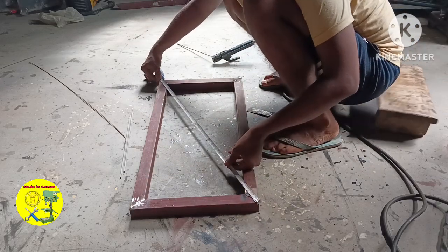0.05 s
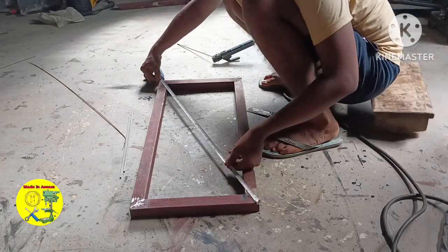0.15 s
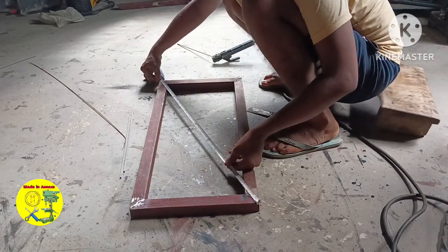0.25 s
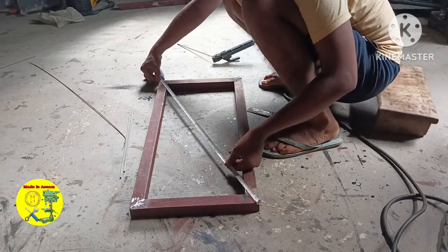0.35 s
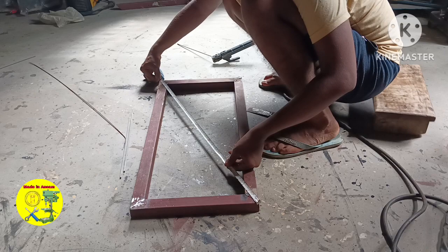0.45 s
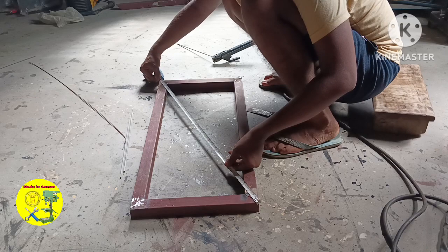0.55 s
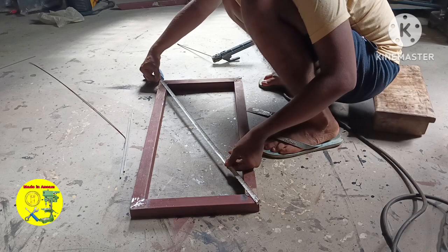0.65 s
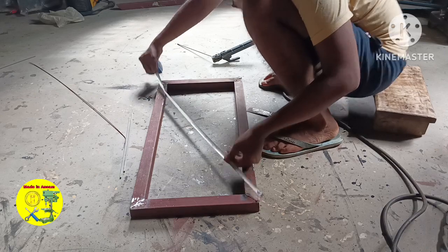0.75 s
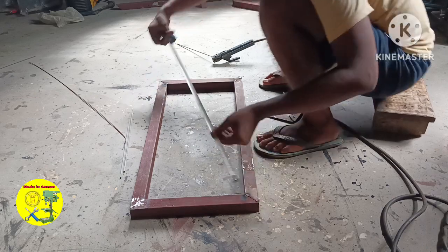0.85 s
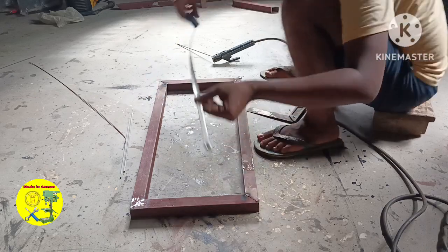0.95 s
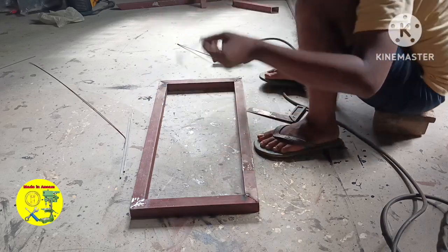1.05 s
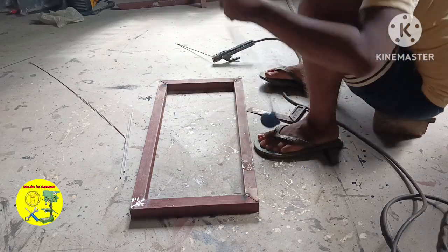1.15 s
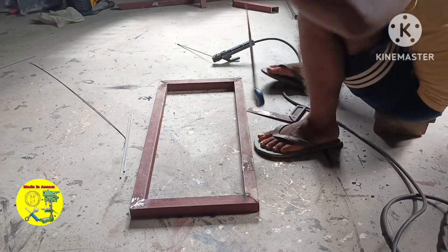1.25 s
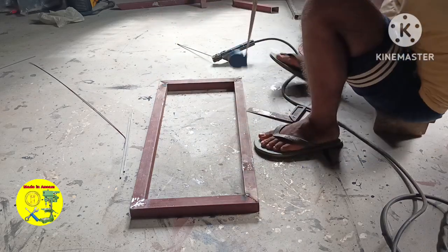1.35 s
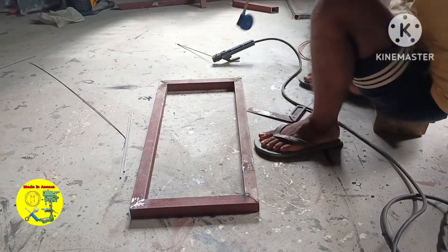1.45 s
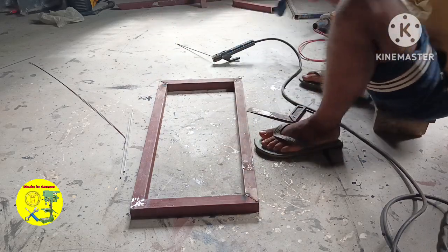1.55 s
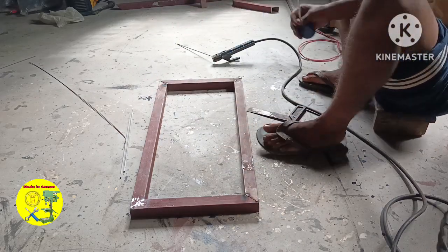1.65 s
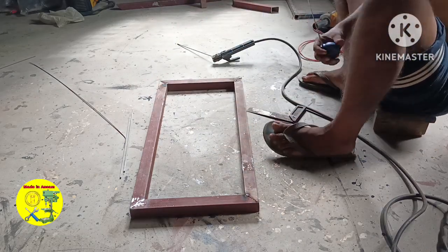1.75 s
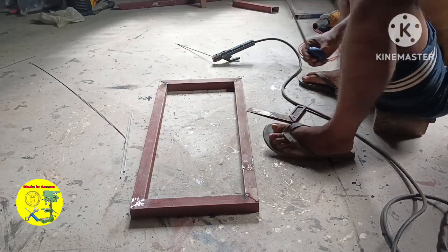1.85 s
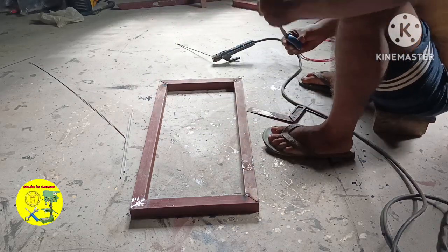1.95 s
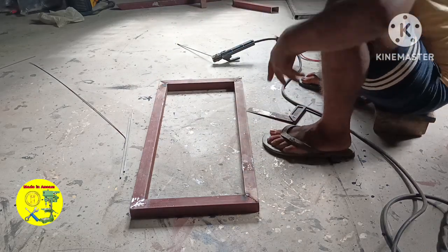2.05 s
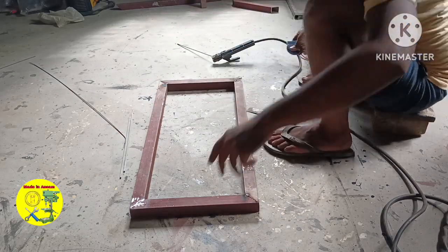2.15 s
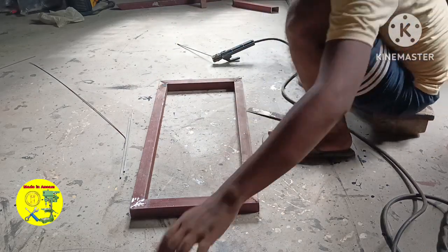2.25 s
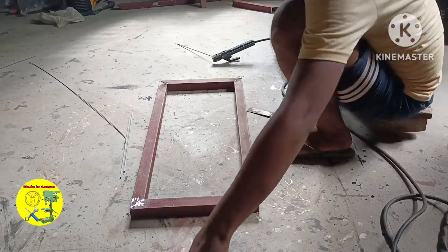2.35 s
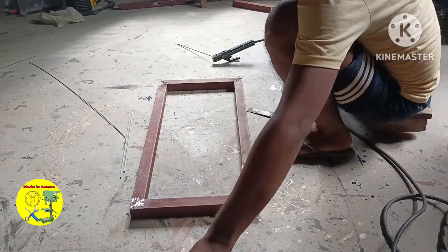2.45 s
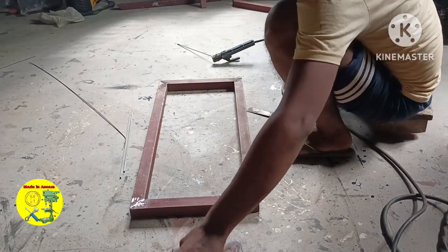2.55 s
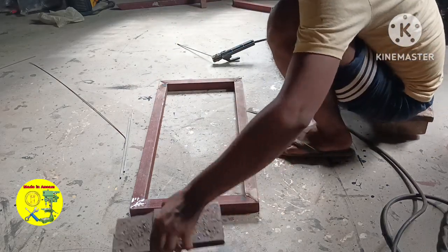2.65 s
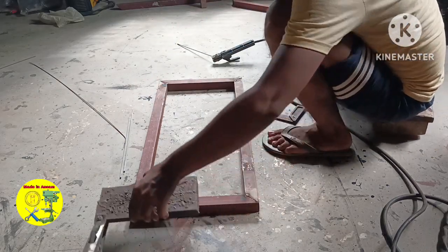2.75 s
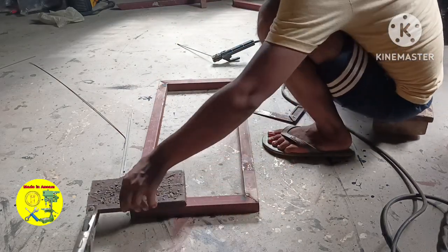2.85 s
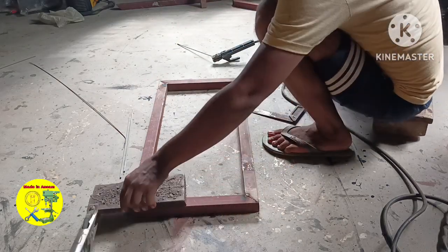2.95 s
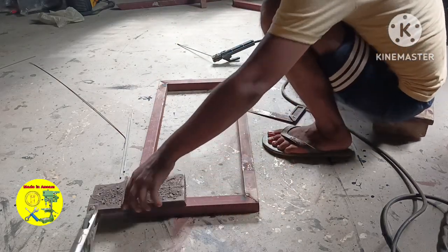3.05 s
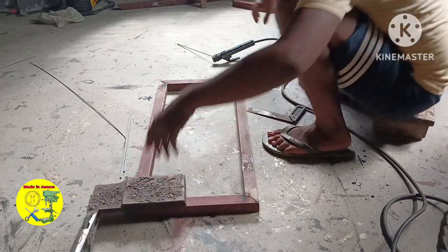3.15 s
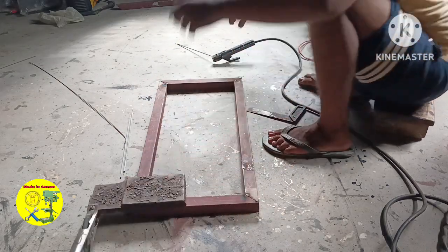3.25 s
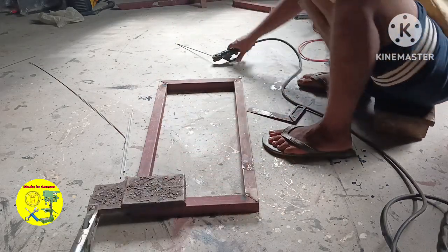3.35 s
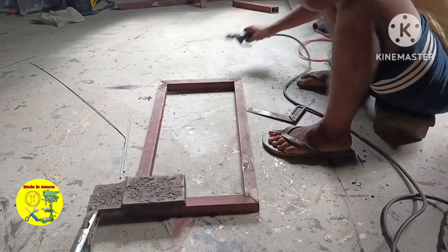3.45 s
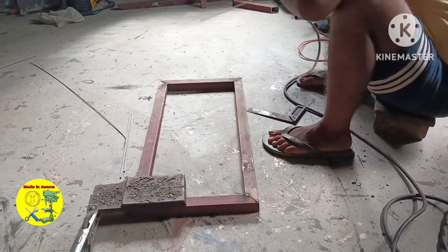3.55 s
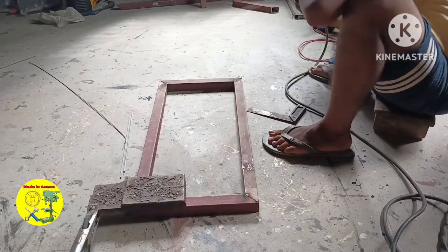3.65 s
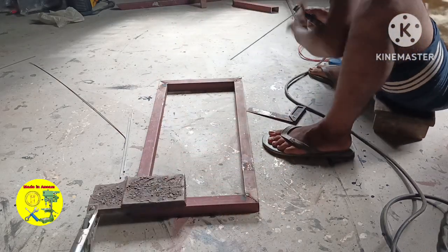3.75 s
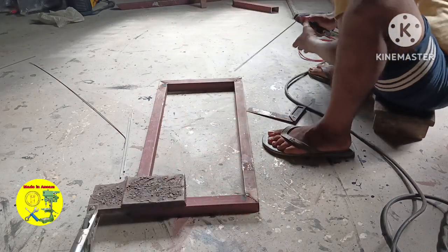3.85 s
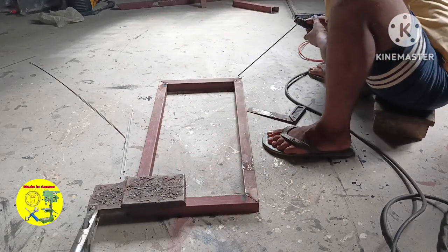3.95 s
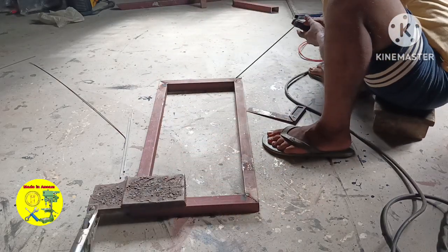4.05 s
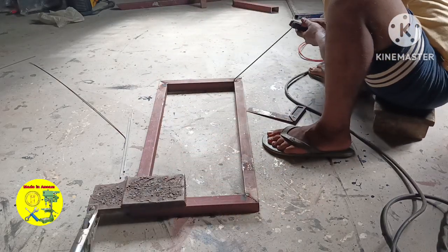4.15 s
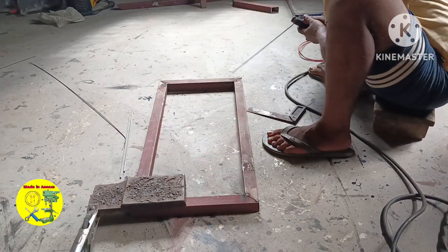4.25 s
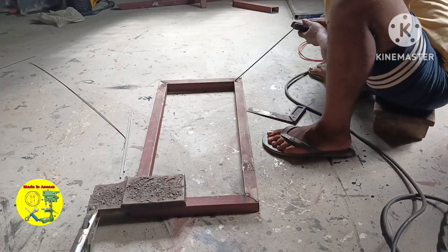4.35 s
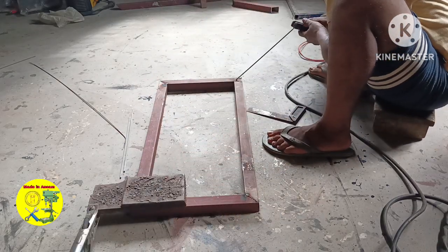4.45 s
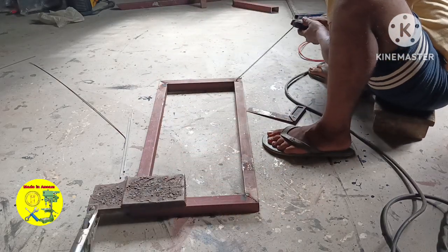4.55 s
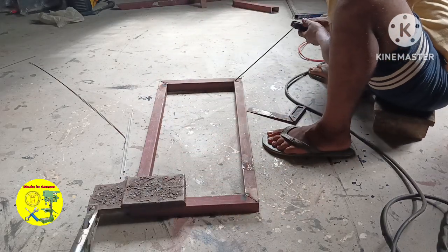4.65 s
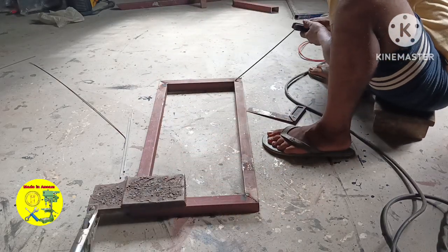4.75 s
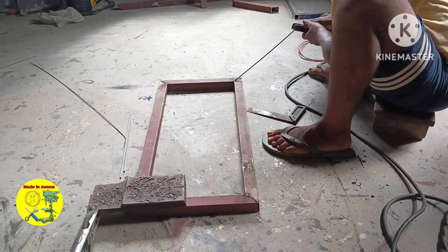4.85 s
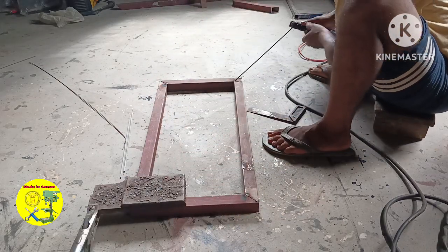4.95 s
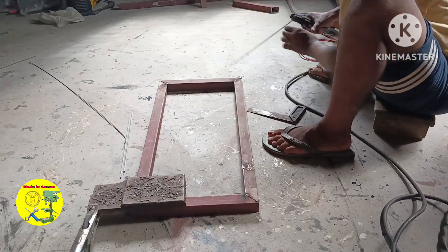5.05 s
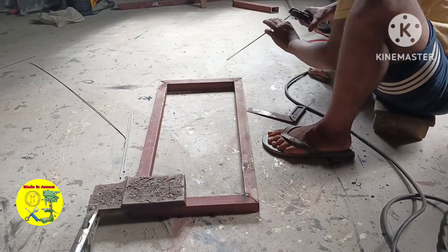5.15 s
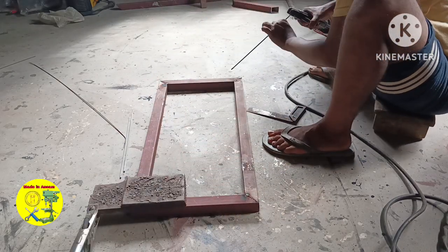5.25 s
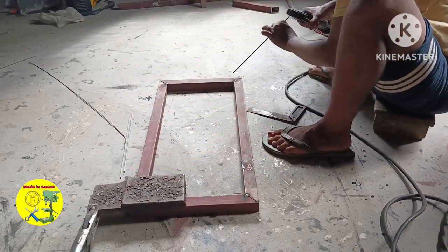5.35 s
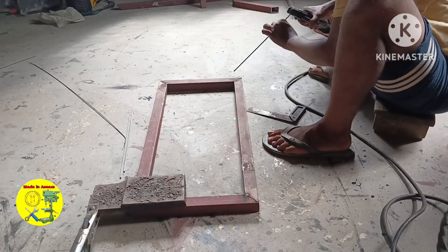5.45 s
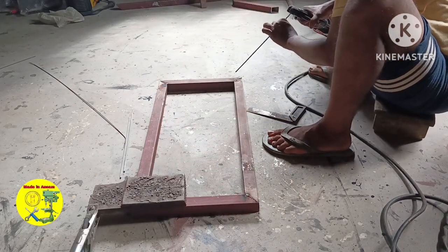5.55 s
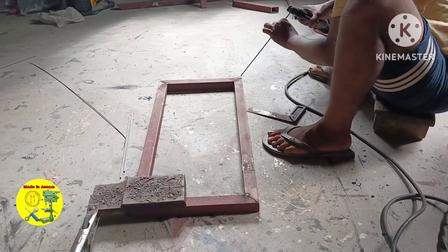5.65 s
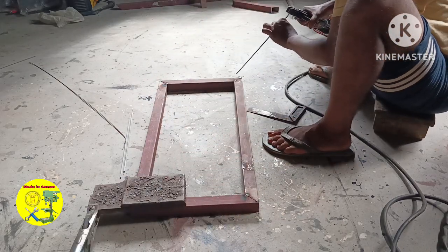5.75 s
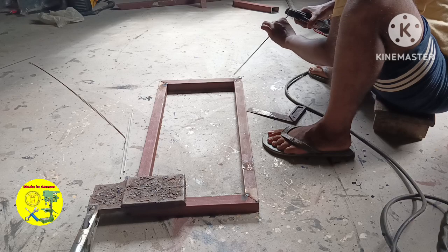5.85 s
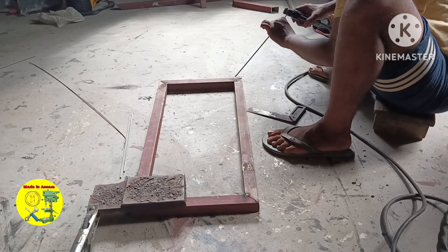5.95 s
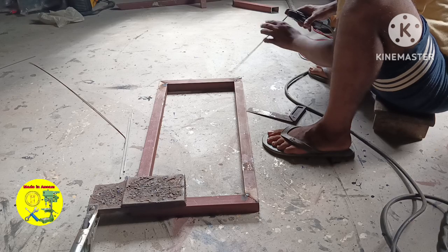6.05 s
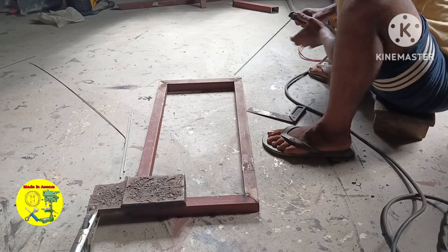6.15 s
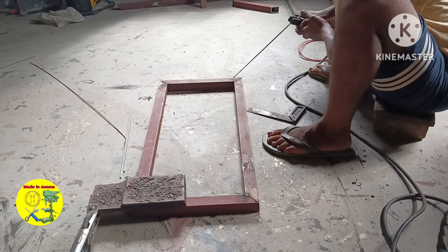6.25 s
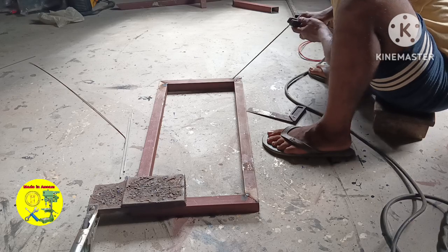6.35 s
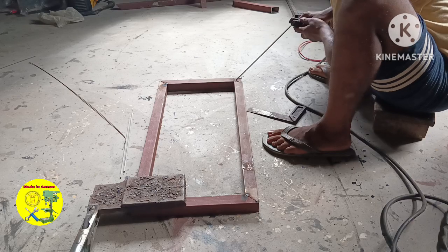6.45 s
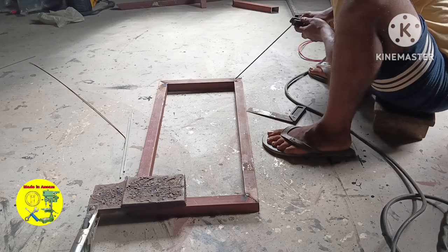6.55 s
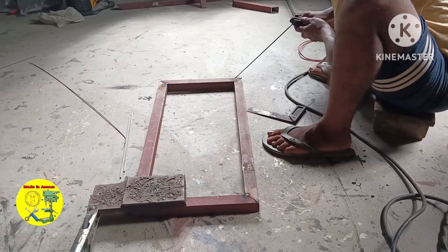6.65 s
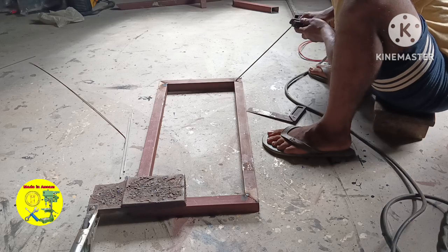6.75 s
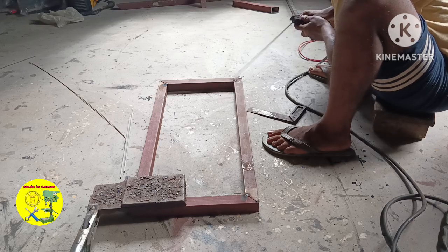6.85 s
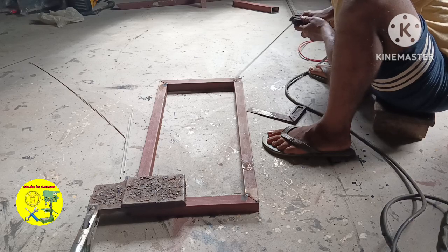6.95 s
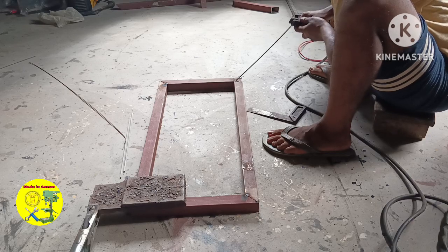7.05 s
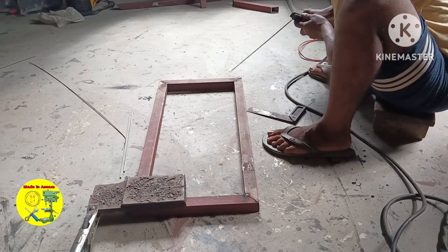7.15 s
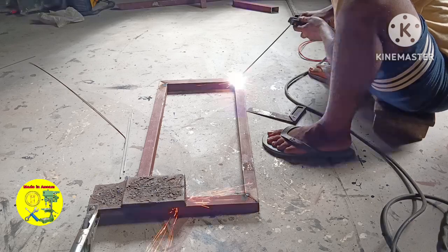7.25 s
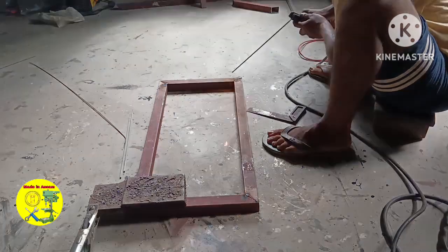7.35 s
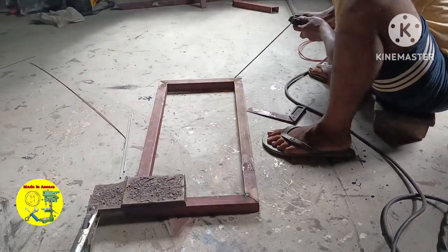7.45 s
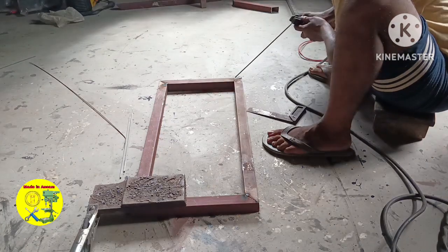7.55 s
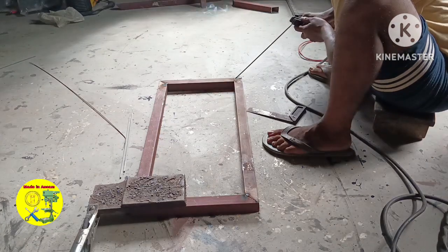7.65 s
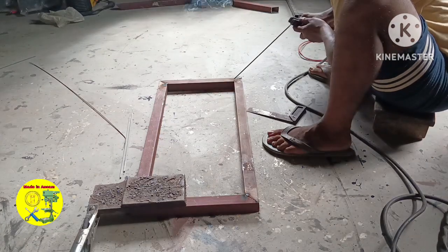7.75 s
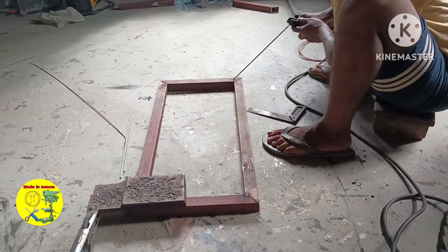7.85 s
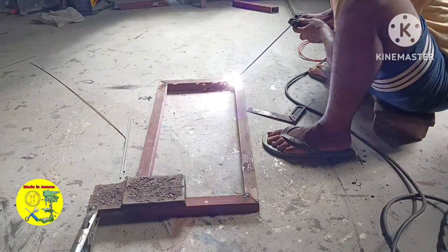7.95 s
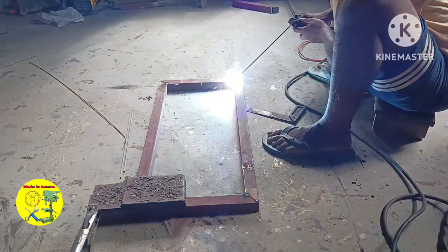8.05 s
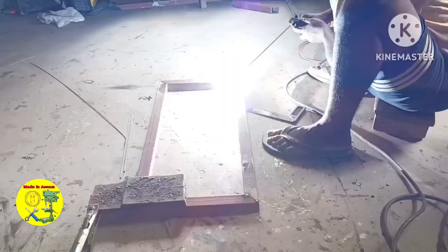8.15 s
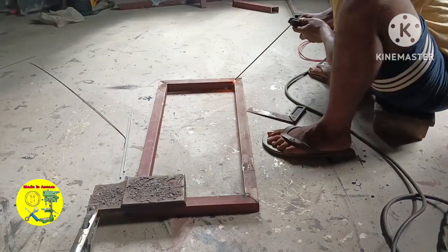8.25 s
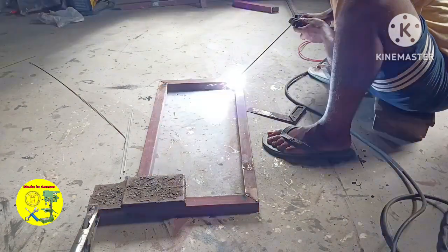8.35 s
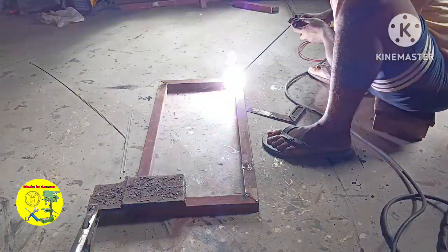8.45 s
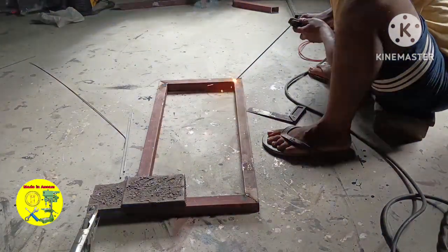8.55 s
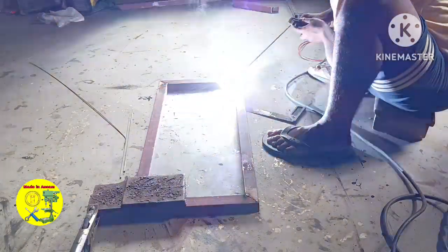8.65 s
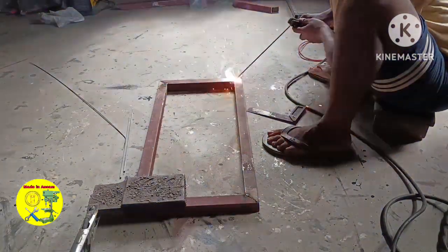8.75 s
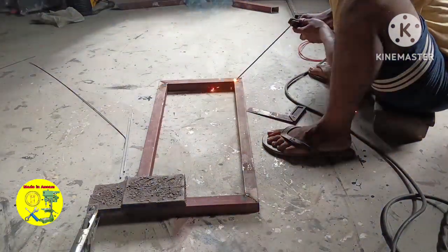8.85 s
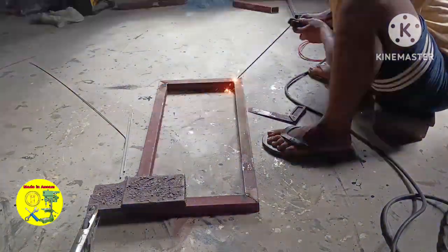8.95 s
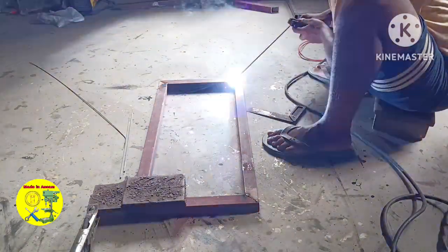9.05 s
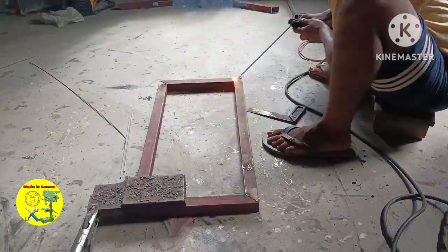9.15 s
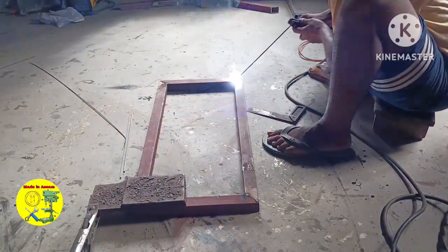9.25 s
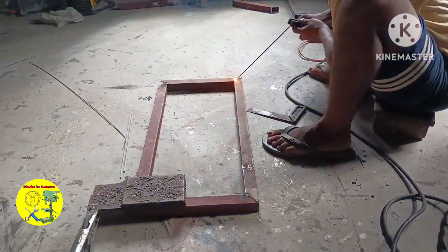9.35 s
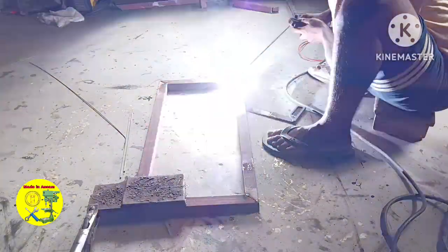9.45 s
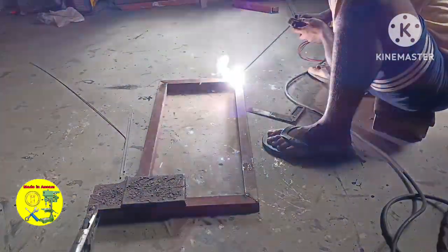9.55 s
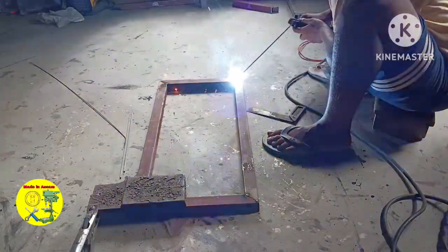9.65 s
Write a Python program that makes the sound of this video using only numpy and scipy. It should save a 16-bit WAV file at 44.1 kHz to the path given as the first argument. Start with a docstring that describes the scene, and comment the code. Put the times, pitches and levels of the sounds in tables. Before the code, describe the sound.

Close view from a hard workshop floor, with short, scattered reflections. Over air rush, fan whine and high insect chirps, distant hollow knocks give way to a thin metal tape snapping, then a heavy slab bouncing on steel with a scrape. An electrode ticks and rings against the frame, sparsely, then faster, until welding spits, crackles and sizzles in uneven bursts to the end. Narrow stereo with automatic level control.

```python
"""Knocks and even slaps far off come first, over the whine of a welding machine's fan and a cricket's chirps.
We stand on a workshop floor with two microphone ports a hand apart and a quick gain control. A steel tape
snaps back, a slab is dropped on a steel frame, and an electrode taps the frame until the arc strikes and sizzles.
Blows are decaying modes with a crack of noise; arc, sliding and air are shaped noise; the fan adds steady tones."""
import sys
import numpy as np
from scipy import signal
from scipy.fft import rfft, irfft
from scipy.io import wavfile
from scipy.ndimage import uniform_filter1d

SR = 44100
rng = np.random.default_rng(int(sys.argv[2]) if len(sys.argv) > 2 else 0)


def master(y):
    """Save y as 16-bit WAV."""
    cut = np.clip(np.atleast_2d(y).T, -1, 1)
    pcm = np.round(cut * 32767)  # scale
    wavfile.write(sys.argv[1], SR, pcm.astype(np.int16))


N = 427329  # length of the scene in samples

# The arc burns in flares. Each row: start in seconds, hold in seconds, level in dB, t60 of the dying in seconds,
# body below 4 kHz against the hiss in dB.
FLARES = [(7.284, 0.054, -37, 0.14, -8), (7.997, 0.0036, -40.5, 0.22, -5.5),
          (8.064, 0.073, -48.5, 0.15, 1.5), (8.233, 0.0052, -45, 0.067, 1), (8.387, 0.0042, -54, 0.29, 4.5),
          (8.414, 0.072, -48, 0.64, -2.5), (8.707, 0.067, -49, 0.68, 1.5), (8.944, 0.06, -53.5, 0.39, -1),
          (9.117, 0.033, -54, 0.94, -4), (9.252, 0.14, -53.5, 0.24, -2), (9.494, 0.17, -50.5, 0.36, 2.5)]
# Colour of the sizzle. Each row: frequency in Hz, density in dB per Hz.
SIZZLE = [(250, -12), (728, -6.5), (809, -55), (1050, -12), (1880, -8), (10500, -3), (14600, -0.5),
          (15700, 4.5), (16500, -58)]
FLARE_RISE_S = 0.005
JUMP, CREEP = 0.86, 0.4  # share of a flare that comes at once; share of its hold over which the rest grows
SPITS_PER_S, SPIT_DB, SPIT_ABOVE_HZ = 22, -9.5, 10000  # sparse bright droplets bursting
FLUTTER_DB = 1.6


def arc():
    """The plasma hisses and spits droplets; the boiling pool's low body has its own level in each flare."""
    sound = coloured(sputter(3000, 3.6, 1.1), lambda f: read(SIZZLE, f) - 40 * (f < 150))
    body = coloured(sound, lambda f: -10 * np.log10(1 + (f / 4000) ** 8))
    hiss = sound - body
    high_pass = signal.butter(2, SPIT_ABOVE_HZ, "high", fs=SR)
    droplets = signal.lfilter(*high_pass, sputter(SPITS_PER_S, 4.8, 0))
    hiss_level, body_level = np.zeros(N), np.zeros(N)
    for s, hold, db, t60, body_db in FLARES:
        jump = swell(s, FLARE_RISE_S, hold, db, t60)
        creep = swell(s, FLARE_RISE_S + CREEP * hold, (1 - CREEP) * hold, db, t60)
        flare = JUMP * jump + (1 - JUMP) * creep
        hiss_level += flare
        body_level += gain_of(body_db) * flare
    bright = hiss + gain_of(SPIT_DB) * np.std(sound) * droplets
    burning = hiss_level * bright + body_level * body
    return gain_of(FLUTTER_DB * slow(120)) * burning / np.std(hiss)


# The loudest droplets bursting. Each row: time in seconds, peak in dB before colouring by the ports.
LOUD_SPITS = [(7.334, -16), (7.9975, -13), (8.001, -17), (8.153, -20), (8.247, -27), (8.384, -16),
              (8.433, -22), (8.49, -21), (8.783, -15), (8.8094, -22), (8.951, -24), (9.1596, -23),
              (9.205, -24), (9.2853, -24), (9.337, -25), (9.387, -24), (9.62, -21), (9.655, -22),
              (9.6764, -18)]
# Colour of one click. Each row: frequency in Hz, density in dB per Hz.
SPIT_COLOUR = [(300, -50), (1500, -15), (4000, -2), (10000, -7), (14500, 3), (16500, -7)]
SMALL_BRIGHT_DB = 1  # smaller droplets are brighter: about a dB per octave for each dB below -14


def spits():
    """Each bursting droplet is one bare click, of either sign."""
    out = np.zeros(N)
    middle = 128
    impulse = np.eye(1, 256, middle)[0]
    for s, peak_db in LOUD_SPITS:
        tilt_db = SMALL_BRIGHT_DB * max(-14 - peak_db, 0)
        click = coloured(impulse, lambda f: read(SPIT_COLOUR, f) + tilt_db * np.log2(1 + f / 4000))
        click *= rng.choice([-1, 1]) / abs(click).max()
        add(out, s - middle / SR, gain_of(peak_db) * click)
    return out


# Pops of the arc. Each row: time in seconds, blow level in dB, brightness in dB per octave.
ARC_POPS = [(7.334, -16, -4.5), (7.9975, -18, 8), (8.247, -38, -3), (8.384, -23, 22), (8.783, -26, 1.5)]
# The weld pool as a struck thing, in four parts. Modes, each row: pitch in Hz, level in dB, t60 in seconds.
# Crack colour, each row: frequency in Hz, density in dB per Hz. Then t60 of the crack in seconds with the
# level in dB and t60 in seconds of the rattle after it. Last, the share of ringing from 0 to 1.
POOL = ([(1880, 0, 0.034)], [(400, -27), (1400, -4.5), (1900, 9), (4200, 6), (14000, -8), (15600, -19),
         (16500, -49)], (0.012, -19, 0.051), 0.13)


def pops():
    """The weld pool pops: nearly all crack, with a short ring."""
    return blows(ARC_POPS, POOL)


# Electrode on the frame. Each row: time in seconds, blow level in dB, brightness in dB per octave.
ROD_TAPS = [(3.482, -30, 8), (4.2389, -21.5, 12), (4.372, -11, 8), (4.6512, -15.5, 13), (5.0569, -39.5, 13),
            (6.6836, -26.5, 6.5), (6.7965, -12, 11), (6.86, -23.5, 15), (6.9628, -7.5, 11),
            (6.997, -21.5, 5.5), (7.1284, -9, 11), (7.173, -21, 7.5), (7.2808, -8.5, 12)]
# Ringing rod. Modes in Hz, dB, t60 in s; crack colour in Hz, dB per Hz; crack t60 in s, rattle dB, t60 in s; share.
ROD = ([(4160, 0, 0.11), (5160, 16, 0.14), (5580, 14.5, 0.086), (5900, 1, 0.11), (7200, -19, 0.12),
        (8700, 14.5, 0.12), (9130, 12, 0.059), (10680, 11.5, 0.037), (13300, 10, .05), (14400, 7, .035)],
        [(2500, -12.5), (4400, -6.5), (5250, -12), (6300, -11), (8800, -12.5), (10700, -16), (15000, -23),
        (16500, -23)], (0.08, -11, 0.28), 0.6)
# Tip of the rod. Modes in Hz, dB, t60 in s; crack colour in Hz, dB per Hz; crack t60 in s, rattle dB, t60 in s; share.
TICK = ([(10700, 0, .02)], [(7000, -30), (9500, -6), (10800, 0), (12500, -4), (15500, -10)],
         (.012, -40, .03), .7)
TICK_DB = -2.5  # against the tap


def rod_taps():
    """The electrode rings high and chatters, and its tip ticks at each tap."""
    ticks = [(s, db + TICK_DB, 0) for s, db, _ in ROD_TAPS]
    return blows(ROD_TAPS, ROD, bunch=0.0131, bounce_db=-7.5) + blows(ticks, TICK)


# Slab landing. Each row: time in seconds, blow level in dB, brightness in dB per octave.
SLAB_BLOWS = [(2.9607, -10, 2.5), (2.98, -16.5, 4.5), (3.005, -17, 2.5), (3.036, -35, -2.5)]
# Slab. Modes in Hz, dB, t60 in s; crack colour in Hz, dB per Hz; crack t60 in s, rattle dB, t60 in s; share.
SLAB = ([(1460, -0.5, 0.2), (1875, 1, 0.092), (1984, 11, 0.074), (2230, 4, 0.11), (2413, 5, 0.11),
         (4000, -1.5, 0.13), (4430, 5, 0.054), (6500, -9, .05)], [(240, -61), (400, -5.5), (1250, -14),
         (1990, -3.5), (4800, -11), (11000, -16), (15300, -25), (16500, -75)], (0.032, 0, 0.16), 0.4)
# Low booms of the frame. Each row: time in seconds, blow level in dB, brightness in dB per octave.
FRAME_BOOMS = [(2.962, -44, 0), (3.0, -34.5, -5), (7.345, -42.5, -4), (8.24, -49, -10), (9.39, -45, 21)]
# Frame. Modes in Hz, dB, t60 in s; crack colour in Hz, dB per Hz; crack t60 in s, rattle dB, t60 in s; share.
FRAME = ([(209.8, 2, 0.63), (275, 0, 0.22), (402, 1, 0.15)], [(140, -50), (200, 1), (450, 4), (800, -23),
          (2000, -64)], (0.14, -10, 0.19), 0.43)


def slab_and_frame():
    """The slab clangs and bounces in its middle modes; the steel frame booms in low ones."""
    return blows(SLAB_BLOWS, SLAB, bunch=0.0083, bounce_db=-2.5) + blows(FRAME_BOOMS, FRAME)


# Tape clacks. Each row: time in seconds, blow level in dB, brightness in dB per octave.
TAPE_SNAPS = [(.9885, -14, -2.5), (1.063, -27, -6), (1.150, -24.5, -3), (1.218, -13.5, -6.5),
              (1.231, -13, 3), (1.243, -13.5, -2.5), (1.262, -24, -5), (2.023, -27.5, 1),
              (2.1355, -17.5, -4.5), (2.1515, -14, 0)]
# Tape. Modes in Hz, dB, t60 in s; crack colour in Hz, dB per Hz; crack t60 in s, rattle dB, t60 in s; share.
TAPE = ([(6150, 1.5, 0.021), (8860, 15, 0.017), (11700, -8, .02)], [(880, -20.5), (1500, -18.5), (6490, 2),
         (14900, 9.5), (15900, 19.5), (16500, -56)], (0.016, -16, 0.2), 0.41)


def tape_snaps():
    """The thin steel tape clacks: high modes that die at once in a bright crack."""
    return blows(TAPE_SNAPS, TAPE)


# Tape sliding into its case, grit under the slab. Each row: start in seconds, rise in seconds, level in dB,
# t60 of the dying in seconds, brightness in about dB per octave.
SLIDES = [(.87, 0.043, -57, 0.33, 0), (1.9, 0.079, -59, 0.35, 0), (2.05, 0.062, -46.5, .17, -3.5),
          (2.895, 0.0073, -51, 0.18, -9), (3.06, 0.0051, -28.5, 0.083, -1)]


def slides():
    """Fine gritty friction, a sputter of tiny bursts in the colour of the tape's crack."""
    grit = sputter(5000, 2.5, 1.1)
    tape_colour = TAPE[1]
    out = np.zeros(N)
    for s, rise, db, t60, tilt_db in SLIDES:
        rub = coloured(grit, lambda f: read(tape_colour, f) + tilt_db * np.log2(1 + f / 4000))
        out += swell(s, rise, 0, db, t60) * evened(rub)
    return out


# Knocks far off. Each row: time in seconds, blow level in dB, brightness in dB per octave.
FAR_KNOCKS = [(.004, -31, 15), (.058, -17.5, 2), (0.1386, -14.5, 7.5), (.225, -25.5, -3),
              (.2955, -17.5, 6.5), (.369, -31.5, -12), (.432, -21.5, 1), (.552, -24, 4), (.613, -28.5, -3),
              (3.595, -30, 3)]
# Knocked thing. Modes in Hz, dB, t60 in s; crack colour in Hz, dB per Hz; crack t60 in s, rattle dB, t60 in s; share.
FAR = ([(480, -6, 0.073), (745, -9, 0.045), (940, 5.5, 0.049), (1192, 6, 0.039), (1433, 4, 0.043)],
        [(250, -47), (500, 13.5), (1000, 8), (1500, 7.5), (2400, -16), (4000, -40)], (0.019, -15.5, 0.15),
        0.58)
# Hollow notes among the knocks. Each row: time in seconds, blow level in dB, brightness in dB per octave.
FAR_RINGS = [(.002, -33, -2), (.151, -19, 6), (.302, -21.5, -2), (.382, -31, 0), (.436, -27, 0),
             (.56, -29, 0)]
# Hollow note. Modes in Hz, dB, t60 in s; crack colour in Hz, dB per Hz; crack t60 in s, rattle dB, t60 in s; share.
HOLLOW = ([(1417, 0, 0.051)], [(900, -31), (1250, -12), (1435, 3), (1650, -21), (2300, -44)],
           (0.045, -14, 0.093), 0.88)


def far_knocks():
    """Knocks ring in middle modes and bounce; a single hollow note sounds among them."""
    return blows(FAR_KNOCKS, FAR, bounce_db=-6) + blows(FAR_RINGS, HOLLOW, bunch=0.0062)


# Slap. Modes in Hz, dB, t60 in s; crack colour in Hz, dB per Hz; crack t60 in s, rattle dB, t60 in s; share.
SLAP = ([(1930, 0, 0.04)], [(1000, -37), (1600, 4), (3800, -3.5), (4600, -17), (9000, -28)],
         (0.031, -6, 0.33), 0.24)
SLAP_FIRST_S, SLAP_EVERY_S = .071, .181
SLAP_DB, SLAP_TILT_DB = -33.5, 2.5  # blow level; brightness per octave


def far_slaps():
    """Four even slaps far off, mostly crack over one mode."""
    slaps = [(SLAP_FIRST_S + k * SLAP_EVERY_S, SLAP_DB, SLAP_TILT_DB) for k in range(4)]
    return blows(slaps, SLAP)


BLOW_RISE_S = 0.0018  # low-ringing things take one cycle instead
BOUNCES_PER_S, BOUNCE_T60_S = 260, 0.071  # a struck thing chatters briefly


def blows(events, thing, bunch=0.011, bounce_db=-20):
    """A dying crack plus modes, each a bunch of four partials struck differently every time; bounces follow."""
    modes, colour, (crack_t60, rattle_db, rattle_t60), ring = thing
    hz, db, t60 = np.transpose(modes * 4)[:, :, None]
    t, out = np.arange(8000) / SR, np.zeros(N)
    middle_hz = np.exp(np.mean(np.log(hz)))
    head = max(200, round(6 * SR / middle_hz))  # samples of the onset that set the level
    rise = np.minimum(t / max(BLOW_RISE_S, 1 / middle_hz), 1)
    crack_fall = gain_of(-60 * t / crack_t60) + gain_of(rattle_db - 60 * t / rattle_t60)
    for s, blow_db, tilt_db in events:
        strength, detune = rng.standard_normal((2, len(hz), 1))
        struck_db = db + 2.2 * strength + tilt_db * np.log2(hz / middle_hz) - 60 * t / t60
        partials = gain_of(struck_db) * np.sin(2 * np.pi * hz * (1 + bunch * detune) * t)
        rung = partials.sum(0)
        noise = coloured(rng.standard_normal(len(t)), lambda f: (
            read(colour, f) + tilt_db * np.log2(np.clip(f / middle_hz, .3, 4))))
        crack = noise * crack_fall
        sound = ring * rung / rung[:head].std() + (1 - ring) * crack / crack[:head].std()
        sound = 0.37 * sound * rise
        bounce_at = rng.random(len(t)) < BOUNCES_PER_S / SR
        bounces = bounce_at * rng.standard_normal(len(t)) * gain_of(bounce_db - 60 * t / BOUNCE_T60_S)
        chatter = signal.fftconvolve(sound, bounces)[:len(t)]
        add(out, s, gain_of(blow_db) * (sound + chatter))
    return out


# Dull low thumps. Each row: time in seconds, level in dB.
THUMPS = [(0.299, -69), (0.661, -78), (0.98, -70.5), (3.005, -64.5), (3.878, -64.5), (4.699, -65.5),
          (5.499, -65.5)]
THUMP_HZ = 103.2  # where the pitch settles
SECOND_S, SECOND_DB = .322, -9  # the softer thump behind each one


def thumps():
    """Soft low pushes in pairs, decaying sines that sag in pitch."""
    t, out = np.arange(15000) / SR, np.zeros(N)
    cycles = THUMP_HZ * (t + 0.0038 * (1 - np.exp(-t / 0.11)))
    push = gain_of(-60 * t / 1.0) * np.minimum(t / 0.012, 1) * np.sin(2 * np.pi * cycles)
    for s, db in THUMPS:
        add(out, s, gain_of(db) * push)
        add(out, s + SECOND_S, gain_of(db + SECOND_DB) * push)
    return out


# Bouts of the cricket. Each row: start in seconds, length in seconds, level in dB.
CRICKET = [(0.089, 5.2, -61.5), (5.86, .45, -65), (7.524, .2, -66)]
CHIRPS_PER_S, CHIRP_S = 7.78, .045


def cricket():
    """Bouts of short, slightly rough tones: one narrow noise band gated about eight times a second."""
    t, gate = np.arange(N) / SR, np.zeros(N)
    for s, length, db in CRICKET:
        in_bout = (t >= s) & (t < s + length)
        in_chirp = (t - s) % (1 / CHIRPS_PER_S) < CHIRP_S
        gate += gain_of(db) * (in_bout & in_chirp)
    return uniform_filter1d(gate, size=200) * gain_of(slow(4.0)) * band(8245, 36)


# Fan tones. Each row: multiple of the blade rate, level in dB before the lean to the left.
FAN = [(5.6, -73.5), (7, -59.5), (14, -57.5), (16, -69.5), (20, -81), (21, -72)]
# Hollow notes of the fan casing. Each row: pitch in Hz, width in Hz, level in dB.
CASING = [(805.8, 31.6, -56.5), (204, 37, -72.5), (568.5, 97, -65), (1803, 93, -60), (3880, 1020, -65.5)]
BLADE_HZ = 188.2


def fan():
    """Wavering blade tones and noise in the casing; the whine is stronger on the left."""
    blade_cycles = np.cumsum(BLADE_HZ * (1 + 0.00074 * slow(6))) / SR
    whine, casing = np.zeros(N), np.zeros(N)
    for multiple, db in FAN:
        tone = np.sqrt(2) * np.sin(2 * np.pi * (multiple * blade_cycles + rng.random()))
        whine += gain_of(db + 0.72 * slow(15)) * tone
    for hz, width, db in CASING:
        casing += gain_of(db) * band(hz, width)
    return whine * gain_of([[3.0], [-3.0]]) + casing


# Colour of room air and fan rush. Each row: frequency in Hz, density in dB per Hz.
AIR = [(24, -7), (40, -20.5), (196, -21), (271, -14.5), (725, -0.5), (802, 4.5), (957, -6.5), (1330, -6),
       (1430, -6), (2370, -10.5), (2620, -5.5), (2830, -9.5), (3050, -12), (14200, -20), (16500, -24.5)]
AIR_DB = -52.5


def air():
    """Rush of air: slowly drifting coloured noise, partly alike at the two ports."""
    pair = coloured(unlike(*rng.standard_normal((2, N))), lambda f: read(AIR, f))
    return gain_of(AIR_DB + .5 * slow(2.05)) * evened(pair)


# Reflections in the shed. Each row: frequency in Hz, t60 in seconds.
SHED = [(200, 0.063), (1500, 0.18), (5000, 0.12), (12000, 0.073)]


def shed(x):
    """Sparse reflections of random sign, other ones at each port, decaying by pitch; three sets take turns."""
    out = np.zeros((2, N))
    for k in range(3):
        taps = np.zeros((2, SR // 2))
        grid = np.arange(200, SR // 2 - 20, 20)
        at = grid + rng.integers(0, 20, (2, len(grid)))
        np.put_along_axis(taps, at, rng.choice([-1., 1.], at.shape), 1)
        hz, t, z = signal.stft(unlike(*taps), SR, nperseg=256)
        tail = signal.istft(z * gain_of(-60 * t / read(SHED, hz)[:, None]), SR, nperseg=256)[1]
        tail /= np.linalg.norm(tail[0])
        turn = np.sqrt(2 / 3) * np.cos(2 * np.pi * (9 * np.arange(N) / SR + k / 3))  # 9 Hz, thirds apart
        out += signal.oaconvolve((turn * x)[None], tail, axes=1)[:, :N]
    return out


# Diffuse sound at the ports. Each row: frequency in Hz, likeness from 0 to 1.
SAME = [(60, 0.65), (500, 1), (1000, 0.25), (2500, 0.019), (6000, 0.01), (15000, 0.011)]


def unlike(a, b):
    """A pair that is alike in the bass and less so in the treble."""
    same = np.clip(read(SAME, np.fft.rfftfreq(len(a), 1 / SR)), 0, 1)
    second = irfft(same * rfft(a) + np.sqrt(1 - same ** 2) * rfft(b), len(a))
    return np.array([a, second])


ASIDE_S = 0.000192  # slab and weld lie further to the right: this much later still at the left port


def aside(x):
    """A pair whose left side comes a little later."""
    delay = np.exp(-2j * np.pi * np.fft.rfftfreq(N, 1 / SR) * ASIDE_S)
    return np.array([irfft(rfft(x) * delay, N), x])


def sputter(per_s, spread_db, hiss):
    """Tiny bursts of uneven size over a hiss."""
    size = gain_of(spread_db * np.minimum(rng.exponential(1, N), 5)) * (rng.random(N) < per_s / SR)
    return evened(evened(size * rng.standard_normal(N)) + hiss * rng.standard_normal(N))


def swell(s, rise_s, hold_s, db, t60):
    """A level that rises, holds and dies away."""
    t = np.arange(N) / SR - s
    return np.clip(t / rise_s, 0, 1) * gain_of(db - 60 * np.maximum(t - rise_s - hold_s, 0) / t60)


def band(hz, width):
    """Noise in one resonance."""
    return evened(coloured(rng.standard_normal(N), lambda f: -20 * np.log10(1 + (2 * (f - hz) / width) ** 2)))


def slow(hz):
    """Random drift up to the given rate, rms 1: a sum of sines of random phase."""
    t, drift = np.arange(0, N, 64) / SR, 0
    for f in np.geomspace(hz / 20, hz, 20):
        drift = drift + np.sin(2 * np.pi * (f * t + rng.random())) / np.sqrt(f)
    return np.interp(np.arange(N) / SR, t, evened(drift))


def coloured(x, db_of_hz):
    """Multiplies the spectrum by a gain curve."""
    gain = gain_of(db_of_hz(np.fft.rfftfreq(x.shape[-1], 1 / SR)))
    return irfft(rfft(x) * gain, x.shape[-1])


def read(points, hz):
    """Reads a table on a log-frequency axis."""
    f, value = np.transpose(points)
    return np.interp(np.log(hz + 1), np.log(f + 1), value)


def gain_of(db):
    """Decibels to a factor."""
    return 10 ** (np.asarray(db) / 20)


def evened(x):
    """Scales to rms 1."""
    return x / np.sqrt(np.mean(x ** 2) + 1e-20)


def add(mix, s, sound):
    """Adds a sound at time s in seconds."""
    part = mix[round(s * SR):][:len(sound)]
    part += sound[:len(part)]


def scene():
    """Direct sounds, their reflections and the steady background."""
    sizzle, bursts = arc(), pops() + spits()
    taps, heavy, snaps, rush = rod_taps(), slab_and_frame(), tape_snaps(), slides()
    knocks, slaps = far_knocks(), far_slaps()
    # how strongly each source excites the shed
    sent = gain_of(-1.5) * taps + gain_of(-5) * knocks + gain_of(-3.0) * (snaps + bursts)
    sent += gain_of(4.0) * heavy + gain_of(4.5) * (rush + sizzle) + gain_of(2.0) * slaps
    direct = taps + snaps + rush + knocks + slaps + aside(heavy + bursts + sizzle)
    background = air() + fan() + cricket() + thumps()
    return direct + shed(sent) + background


# Balance of the ports. Each row: frequency in Hz, left minus right in dB.
LEFT_LOUDER = [(60, 2.5), (150, 3), (300, 4.2), (600, 6), (1200, 5.5), (2400, 7), (4500, 6.5), (8000, 4.5),
               (13000, 1.5)]
# Lag that the housing adds to the delay. Each row: frequency in Hz, lag in radians.
PORT_LAG = [(60, .1), (250, 0.34), (500, 0.32), (1000, 0.77), (3000, 0.12), (6000, 0.031)]
PORT_DELAY_S = 0.00028
DETECTOR_FALL_DB_PER_S = 104
EDGE_HZ = 16750


def record(dry):
    """The left port hears later and louder; roll-offs, gain control that ducks loud sounds, band limit."""
    hz = np.fft.rfftfreq(N, 1 / SR)
    half_lag = np.pi * hz * PORT_DELAY_S + read(PORT_LAG, hz) / 2
    half = gain_of(read(LEFT_LOUDER, hz) / 2) * np.exp(-1j * half_lag)
    treble_cut = (1 + (hz / 15350) ** 60) ** .45
    bass_cut = np.sqrt(1 + (88 / (hz + 1)) ** 4)
    heard = irfft(rfft(dry) * np.array([half, 1 / half]) / treble_cut / bass_cut, N)
    power = signal.lfilter([.015], [1, -.985], (heard ** 2).mean(0))
    power_db = 10 * np.log10(power + 1e-12)
    fall = np.arange(N) * DETECTOR_FALL_DB_PER_S / SR
    held_db = np.maximum.accumulate(power_db + fall) - fall  # jumps up at once, falls steadily
    over_db = np.maximum(held_db + 30.5, 0)
    ducked = heard / gain_of(0.58 * signal.lfilter([.006], [1, -.994], over_db))
    low_pass = signal.firwin(511, EDGE_HZ, window=("kaiser", 9), fs=SR)
    return signal.oaconvolve(ducked, low_pass[None], "same")


dry = scene()
out = record(dry)
master(out)
```